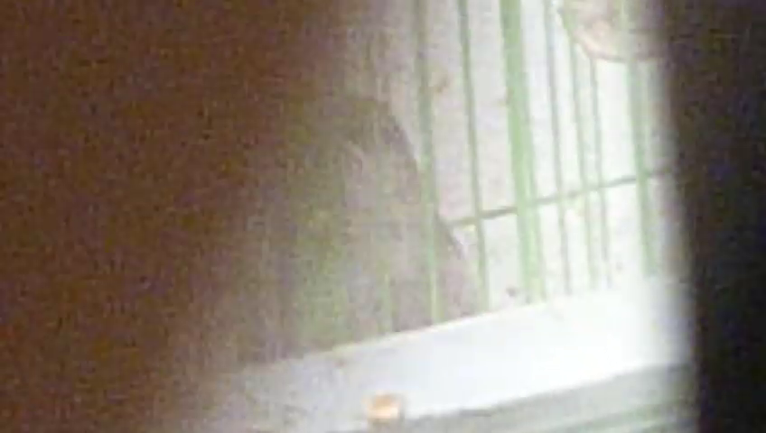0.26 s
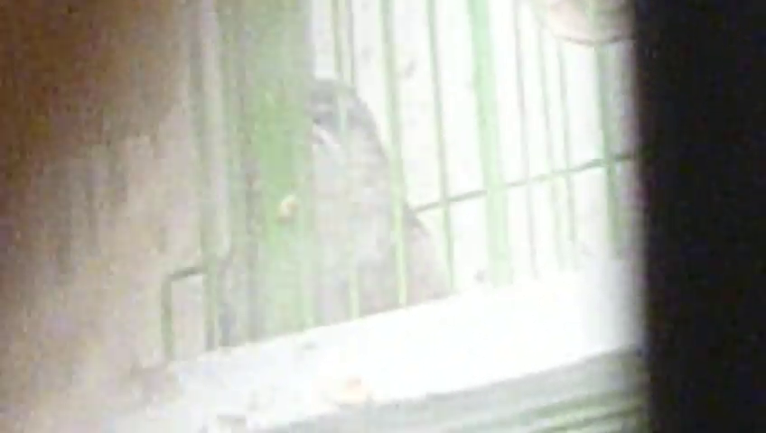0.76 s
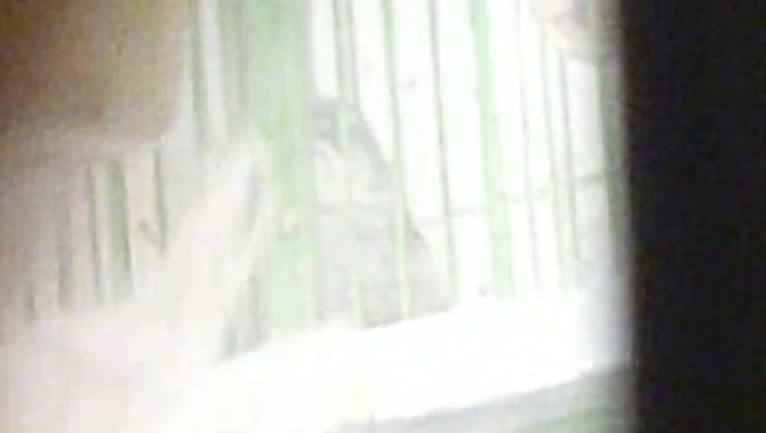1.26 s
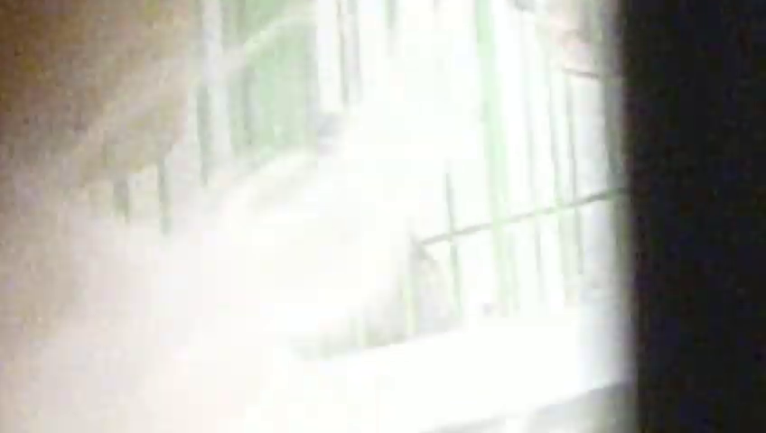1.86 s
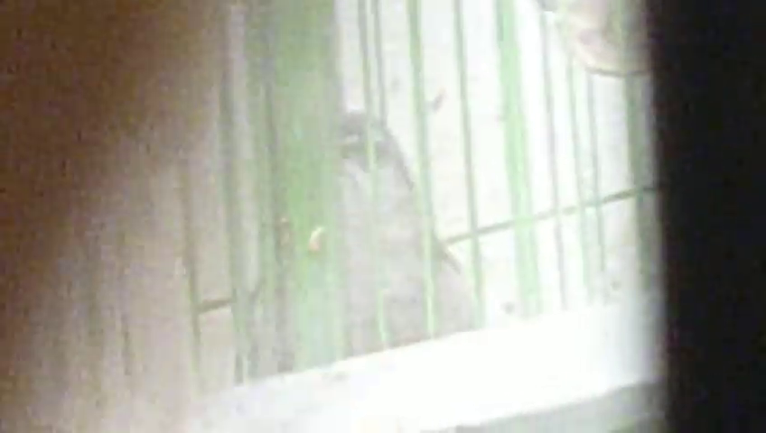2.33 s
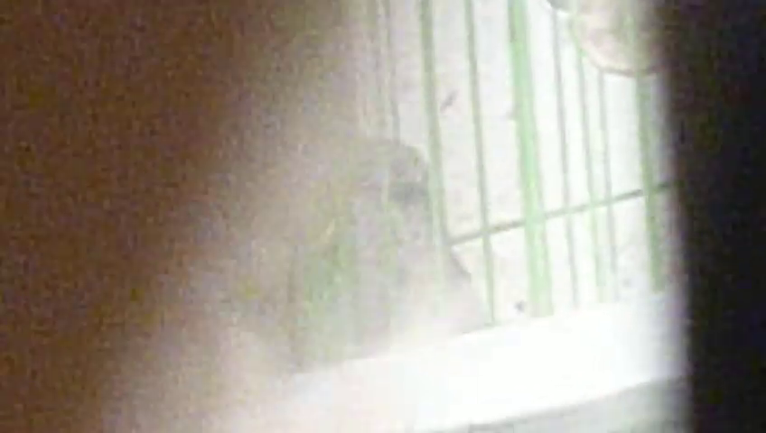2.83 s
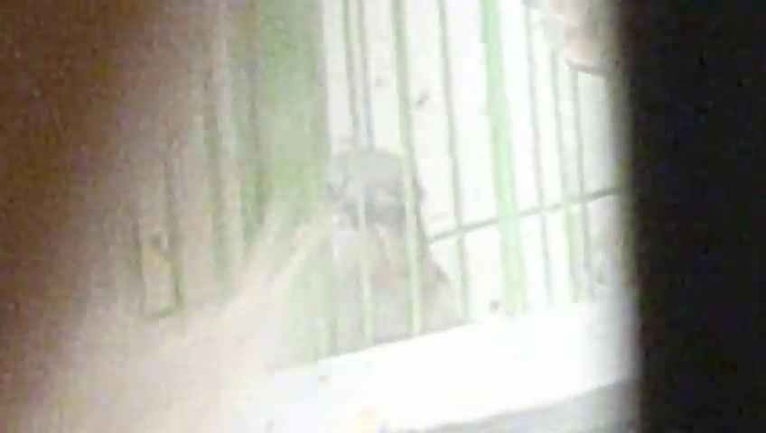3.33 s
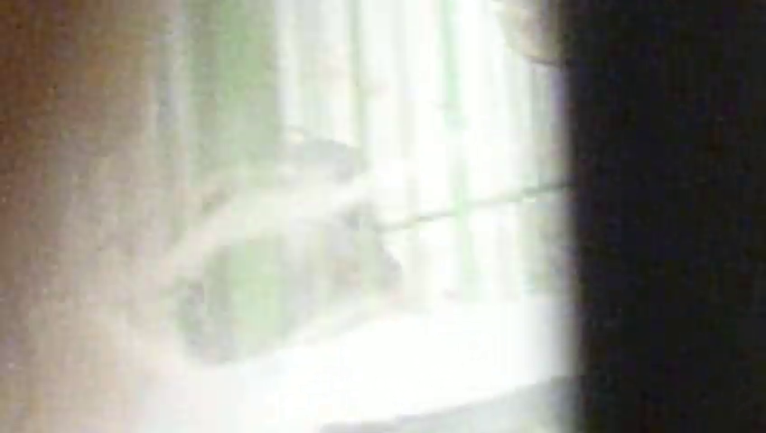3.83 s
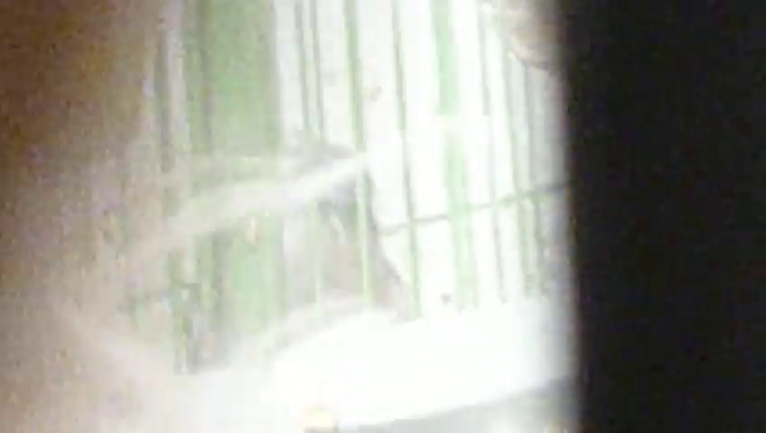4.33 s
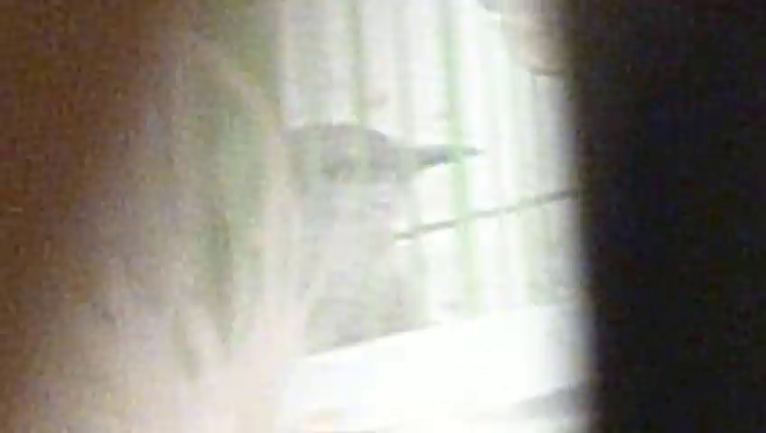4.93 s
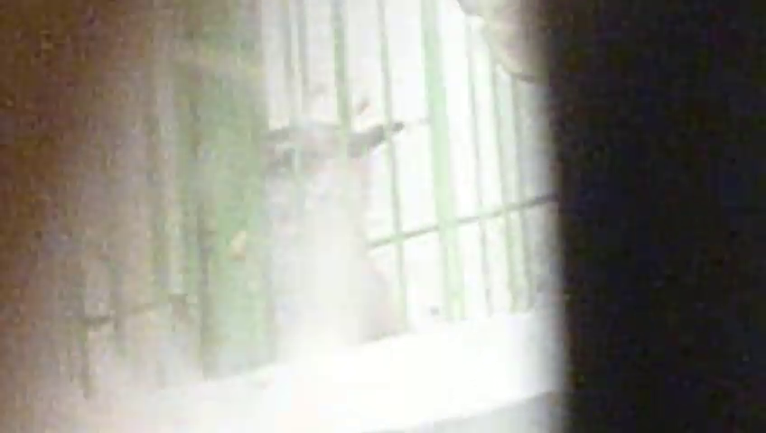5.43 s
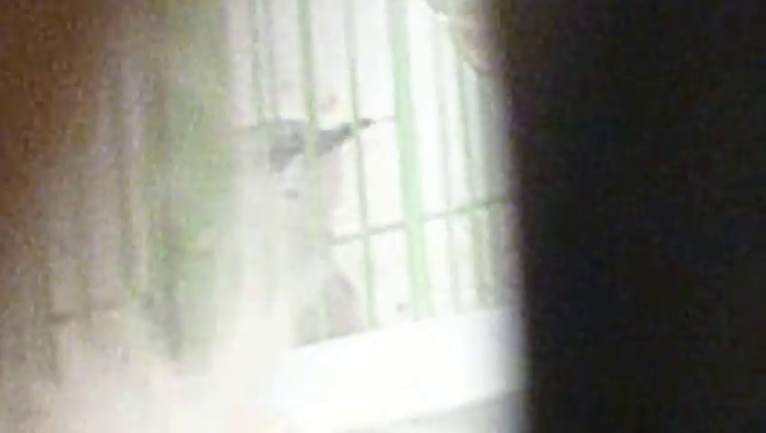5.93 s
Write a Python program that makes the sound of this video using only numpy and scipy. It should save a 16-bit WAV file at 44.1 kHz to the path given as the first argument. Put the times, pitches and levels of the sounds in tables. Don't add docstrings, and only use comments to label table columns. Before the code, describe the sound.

A caged songbird sings some way from a cheap camera in a hard-walled porch; every note is smeared by a short, dense reverberation. From 0 to 1.5 s come loose, very brief chirps, mostly falling glides and steep drops, with gaps around 0.5 s and a busier cluster from 1.2 s. Four arching whistles, climbing then falling, peak near 1.8, 2.1, 2.3 and 2.6 s, some richer in tone. From about 2.75 to 4.2 s it runs into quick slurred warbling around a middle-high pitch. Four louder, hoarse falling chirps with upward hooks follow near 4.3, 4.5, 4.8 and 5.0 s. Four pairs, a low scoop then a short upward flick, end the stretch at 5.25, 5.5, 5.7 and 6.0 s. Fainter, higher whistles from other birds appear occasionally, mainly after 4.3 s. Steady low-weighted hiss, a faint thin whine and sparse electrical ticks continue throughout.

```python
import sys
import numpy as np
from scipy import signal
from scipy.fft import rfft, irfft, next_fast_len
from scipy.io import wavfile
from scipy.ndimage import uniform_filter1d, map_coordinates

SR = 44100
rng = np.random.default_rng(int(sys.argv[2]) if len(sys.argv) > 2 else 0)


def pcm_store(signal):
    levels = np.round(np.clip(np.atleast_2d(signal), -1, 1) * 32767)
    wavfile.write(sys.argv[1], SR, levels.astype(np.int16).T)


def amplitude_ratio(level_db):
    exponent = np.asarray(level_db, float) / 20
    return 10 ** exponent


N = 272749

# (frequency [Hz], density [dB per Hz])
HISS_SPECTRUM = [(20, -22.5), (60, -8.5), (90, -6.5), (150, -2.5), (300, -0.5), (450, -3.5), (700, -6.5),
                 (1200, -10.5), (2500, -14.5), (5000, -18.5), (6500, -19.5), (7600, -23), (8300, -32.5),
                 (9000, -46)]
# (time [s], level [dB])
HISS_LEVEL = [(0.0, -57), (1.03, -57), (1.86, -56.5), (2.48, -57), (2.94, -57), (3.61, -57), (4.78, -56.5),
              (4.96, -57), (6.18, -56.5)]
# (start [s], length [s], start pitch [Hz],
# end pitch [Hz], level [dB])
PURE_GLIDES = [ (.008, 0.015, 4660, 4300, -63), (.04, 0.015, 4830, 4350, -69),
               (.062, 0.078, 4290, 3790, -60), (.75, 0.027, 2600, 2500, -66),
               (.2, 0.034, 2050, 1495, -64), (.205, 0.032, 3010, 2380, -59),
               (.365, .03, 2750, 2330, -67), (.37, 0.049, 1800, 1830, -66.5),
               (.695, 0.0348, 4510, 3960, -59.5), (.83, 0.047, 3060, 2560, -62),
               (.82, .07, 1980, 1850, -68), (1.035, 0.024, 4300, 4880, -66),
               (1.075, 0.028, 5310, 4210, -64), (1.1, 0.053, 4240, 3710, -62),
               (1.23, 0.025, 3084, 3230, -57), (1.24, 0.037, 1960, 2570, -58.5),
               (1.25, 0.016, 2440, 2910, -54), (1.428, 0.056, 3252, 3334, -54),
               (1.482, 0.029, 2075, 2430, -63.5),
               (1.928, 0.11, 2930, 2900, -63.5), (2.412, .06, 3020, 2980, -67),
                (2.752, 0.032, 2980, 3030, -58.5), (2.801, 0.053, 3180, 2926, -58.5),
                (2.909, 0.055, 3080, 2610, -60.5), (3.078, 0.057, 3060, 2986, -58),
                (3.337, 0.058, 3011, 2997, -52.5), (3.378, 0.043, 2140, 1760, -64),
                (3.826, 0.032, 3870, 3320, -68), (3.703, 0.066, 2954, 2926, -68.5),
                (3.845, .04, 2570, 2480, -61), (4.048, .035, 1976, 1560, -64.5),
                (4.085, 0.018, 3370, 3130, -59.5), (4.146, 0.022, 3600, 3590, -59.5),
                (4.863, .04, 3140, 3100, -71), (5.118, 0.036, 3090, 3080, -71),
                (3.988, 0.034, 2746, 2410, -56), (4.017, 0.041, 2460, 2665, -53),
                (1.494, .09, 3300, 3290, -72), (3.618, .04, 3010, 2940, -65),
                (2.969, 0.044, 3030, 3040, -60), (3.397, 0.051, 3020, 3000, -62.5),]
# (frequency [Hz], reverberation time T60 [s])
PORCH_DECAY = [(1500, .22), (3500, 0.22), (7000, 0.49)]
# (frequency [Hz], gain [dB])
MICROPHONE = [(100, -0.5), (1000, 3), (6500, -1.5), (7800, -0.5), (8600, -19.5), (9200, -70)]
# (start [s], length [s], start pitch [Hz], end pitch [Hz], level [dB])
DROPS = [(.112, 0.021, 3900, 3100, -58), (0.726, 0.021, 4060, 2966, -56), (1.252, 0.017, 3215, 2310, -57.5),
         (1.268, 0.024, 2900, 1760, -62), (1.41, 0.017, 4580, 3420, -58), (1.463, 0.0198, 3575, 2520, -57),
         (1.478, .02, 2895, 1956, -56), (3.825, .022, 2730, 2020, -58), (0.371, 0.0299, 2794, 1805, -67),
         (4.745, 0.013, 2607, 1410, -55)]
# (time [s], peak level [dB])
TICKS = [(0.1728, -52), (0.6943, -62), (0.926, -51.5), (1.1865, -56), (1.2255, -51), (1.6213, -52),
         (1.748, -56), (1.8175, -52), (1.8777, -56), (2.0905, -59), (2.3035, -57), (2.6635, -58),
         (2.9183, -71), (3.4466, -60.5), (3.9229, -48.5), (4.037, -54), (4.0925, -53.5), (4.1612, -52.5),
         (4.2272, -49), (4.579, -61), (5.0814, -50), (6.159, -64)]
# (start [s], length [s], start pitch [Hz], end pitch [Hz], level [dB])
NEIGHBOUR_WHISTLES = [ (1.317, 0.049, 423, 416, -58.5), (1.701, 0.034, 5950, 5670, -66),
                      (2.193, 0.023, 4490, 4420, -66), (2.374, 0.045, 4410, 4210, -69),
                      (3.625, 0.036, 2153, 2147, -60.5), (4.346, 0.088, 4670, 4440, -65.5),
                      (4.435, 0.072, 4310, 4110, -63.5), (4.456, 0.067, 3580, 3430, -62),
                      (4.62, .05, 5860, 6590, -66.5), (4.844, 0.053, 6090, 6800, -64.5),
                      (5.098, 0.072, 6000, 6660, -68), (5.378, 0.025, 5480, 5100, -59.5),
                      (5.617, 0.036, 5320, 5650, -66.5), (5.635, 0.05, 3810, 3770, -63),
                      (5.846, 0.045, 5370, 5185, -60.5), (6.11, 0.032, 5200, 5500, -66.5),
                      (4.14, .04, 4520, 4480, -71.5), (4.748, 0.023, 630, 590, -61), ]
# (time [s], pitch [ratio], level [dB], climb's octave [share])
ARCH_SHAPE = [(-.095, .62, -9, 0.73), (-.062, .76, -9, 1), (-.038, .94, -6, 0.86),
              (-.022, 1.01, -7.5, 0.63), (0, .99, -2.5, .2), (.025, .86, 0.5, 0.25),
              (0.059, 0.66, -9.5, .1)]
# (brink [s], top pitch [Hz], level [dB], octave of the climb [dB])
ARCHES = [
    (1.81, 3440, -54, -28),
    (2.08, 3295, -54, 1),
    (2.338, 3330, -54.5, -13),
    (2.624, 3308, -53.5, 1),
]
# (start [s], length [s], start pitch [Hz], end pitch [Hz], level [dB])
WARBLE = [ (2.976, .045, 3106, 2605, -56.5), (3.052, 0.05, 3173, 2490, -60.5),
          (3.239, .05, 2747, 2624, -58), (3.3, 0.047, 3080, 3000, -61.5), (3.336, 0.034, 2780, 2460, -59.5),
          (3.39, 0.049, 3053, 2664, -53), (3.578, .055, 3134, 2596, -60), (3.66, 0.061, 3053, 2826, -56.5),
          (3.727, 0.052, 3300, 2625, -61), (3.796, .035, 3130, 2710, -56.5), (4.06, 0.051, 2994, 2600, -58),
          (4.132, 0.046, 3090, 2630, -56.5), ]
# (length [share], sweep [share], level [dB])
SLUR_SHAPE = [(0, 0, -3.5), (.3, .15, -1.5), (.7, .88, 0.5), (1, 0.99, -3)]
# (time [s], pitch [ratio], level [dB])
CHIRP_PARTS = [
    [(-.028, .8, -10), (-.004, .9, -3.5)],
    [(0, 1, 0.5), (.018, .88, -4.5), (.03, 0.59, -16)],
    [(.035, .6, -13.5), (.07, .58, -21)],
]
# (time [s], pitch [ratio], level [dB])
HOOK_PARTS = [
    [(.03, .86, -14), (.058, .94, -11)],
    [(.061, .99, 2.5), (.068, 1.03, 1.5), (.075, 1.13, -0.5), (.081, 1.26, -8)],
]
# (start [s], pitch [Hz], level [dB], hook pitch [Hz], hook level [dB])
HOOKED_CHIRPS = [
    (4.281, 2868, -49.5, 2946, -60),
    (4.524, 2896, -47.5, 3125, -55.5),
    (4.764, 2855, -51.5, 3105, -54),
    (5.03, 2760, -51.5, 3145, -56.5),
]
# (time [s], pitch [ratio], level [dB])
SCOOP_SHAPE = [(0, 0.76, -7), (.012, .97, 0.5), (.043, 1.01, -3), (.054, 0.7093, 0.5)]
# (time [s], pitch [ratio], level [dB])
FLICK_SHAPE = [(0, .99, 3), (.011, 1.01, -4), (.02, 1.27, -5)]
# (start [s], scoop pitch [Hz], level [dB], delay of flick [s], flick level [dB])
PAIRS = [
    (5.25, 2426, -55.5, 0.089, -55),
    (5.495, 2405, -54, 0.088, -52),
    (5.73, 2360, -55.5, .092, -52),
    (5.984, 2223, -56, 0.069, -53),
]

PURE_OCTAVE_DB, CHIRP_OCTAVE_DB = -32, -25.5


def unit(x):
    return x / np.sqrt(np.mean(x ** 2) + 1e-20)


def along(points, hz):
    f, v = np.transpose(points)
    return np.interp(np.log(hz + 1), np.log(f + 1), v)


def wobble(rate_hz):
    knots = rng.standard_normal(int(N * rate_hz / SR) + 4)
    return map_coordinates(knots, [np.arange(N) * rate_hz / SR])


def coloured(x, spectrum):
    m = next_fast_len(N + 8192)
    gain = amplitude_ratio(along(spectrum, np.fft.rfftfreq(m, 1 / SR)))
    return irfft(rfft(x, m) * gain, m)[:N]


def add_note(track, rows, flutter, fade):
    s, hz, db, octave_db = np.transpose(rows)
    i = np.arange(round(s[0] * SR), min(N, round(s[-1] * SR)))
    t = i / SR

    def smooth(values):
        return uniform_filter1d(np.interp(t, s, values), size=300, mode="nearest")

    phase = 2 * np.pi * np.cumsum(smooth(hz) * flutter[i]) / SR
    nearest_end = np.minimum(t - s[0], s[-1] - t)
    edge = np.sin(np.pi / 2 * np.clip(nearest_end / fade, 0, 1))
    tone = np.sin(phase) + amplitude_ratio(smooth(octave_db)) * np.sin(2 * phase)
    track[i] += np.sqrt(2) * edge * amplitude_ratio(smooth(db)) * tone


def placed(shape, start, hz, db, octave_db):
    return [(start + s, hz * ratio, db + level, octave_db) for s, ratio, level in shape]


def hiss():
    s, db = np.transpose(HISS_LEVEL)
    level = np.interp(np.arange(N) / SR, s, db) + 0.5 + 0.54 * wobble(3.63)
    return unit(coloured(rng.standard_normal(N), HISS_SPECTRUM)) * amplitude_ratio(level)


def whine():
    t = np.arange(N) / SR
    return amplitude_ratio(-78) * np.sin(2 * np.pi * 6667 * t + 0.23 * wobble(26))


def glide(start, length, hz0, hz1, db):
    share = np.array([0, 0.45, 1])
    sweep = np.array([0, 0.6, 1])
    hz = hz0 + (hz1 - hz0) * sweep
    level = db - np.array([1.5, 0, 4.5])
    return np.transpose([start + length * share, hz, level, np.full(3, PURE_OCTAVE_DB)])


def song_notes():
    smooth = [glide(*row) for row in PURE_GLIDES]
    smooth += [slur(*row) for row in WARBLE]
    hoarse = [drop(*row) for row in DROPS] + [arch(*row) for row in ARCHES]
    for row in HOOKED_CHIRPS:
        chirp, hook = hooked_chirp(*row)
        hoarse += chirp
        smooth += hook
    for row in PAIRS:
        hoarse += pair(*row)
    return smooth, hoarse


def songbird():
    smooth, hoarse = np.zeros((2, N))
    tremor = wobble(150)
    smooth_notes, hoarse_notes = song_notes()
    for rows in smooth_notes:
        add_note(smooth, rows, 1 + 0.006 * tremor, fade=0.00073)
    for rows in hoarse_notes:
        add_note(hoarse, rows, 1 + 0.016 * tremor, fade=0.00073)
    swell = amplitude_ratio(1.5 * wobble(90) + 2.5 * wobble(220))
    rasp = 1 + 0.3 * wobble(700)
    return swell * (smooth + hoarse * rasp)


def porch(x):
    slices = np.arange(N) * 12 / SR % 3
    out = np.zeros(N)
    for k in range(3):
        hz, t, z = signal.stft(rng.standard_normal(SR // 2), SR, nperseg=256)
        since = np.maximum(t - .018, 0)
        walls = amplitude_ratio(-60 * since / along(PORCH_DECAY, hz)[:, None])
        yard = amplitude_ratio(-11.0 - 60 * t / 1.1)
        tail = signal.istft(z * (walls + yard), SR, nperseg=256)[1]
        share = np.clip(1 - np.abs((slices - k + 3 / 2) % 3 - 3 / 2), 0, 1)
        delayed = np.pad(x * np.sqrt(share), (60, 0))
        out += signal.fftconvolve(delayed, tail / np.linalg.norm(tail))[:N]
    return out


def drop(start, length, hz0, hz1, db):
    return [(start, hz0, db, PURE_OCTAVE_DB), (start + length, hz1, db - 1.5, PURE_OCTAVE_DB)]


def ticks():
    spikes = (rng.random(N) < 25 / SR) * amplitude_ratio(-50) * rng.standard_normal(N)
    for s, db in TICKS:
        spikes[round((s + .0012) * SR)] = amplitude_ratio(db + 20.5)
    return coloured(spikes, MICROPHONE)


def neighbours():
    track = np.zeros(N)
    flutter = 1 + 0.0032 * wobble(100)
    for start, length, hz0, hz1, db in NEIGHBOUR_WHISTLES:
        rows = [(start, hz0, db, -30), (start + length, hz1, db, -30)]
        add_note(track, rows, flutter, fade=.006)
    return track * amplitude_ratio(0.82 * wobble(65))


def arch(brink, hz, db, climb_db):
    octave_range = climb_db - PURE_OCTAVE_DB
    return [(brink + s, hz * ratio, db + level, PURE_OCTAVE_DB + share * octave_range)
            for s, ratio, level, share in ARCH_SHAPE]


def slur(start, length, hz0, hz1, db):
    share, sweep, level = np.transpose(SLUR_SHAPE)
    hz = hz0 + (hz1 - hz0) * sweep
    return np.transpose([start + length * share, hz, db + level, np.full(len(share), -3)])


def hooked_chirp(start, hz, db, hook_hz, hook_db):
    chirp = [placed(part, start, hz, db, CHIRP_OCTAVE_DB) for part in CHIRP_PARTS]
    hook = [placed(part, start, hook_hz, hook_db, CHIRP_OCTAVE_DB) for part in HOOK_PARTS]
    return chirp, hook


def pair(start, hz, db, after, flick_db):
    scoop = placed(SCOOP_SHAPE, start, hz, db, CHIRP_OCTAVE_DB)
    flick = placed(FLICK_SHAPE, start + after, 2824, flick_db, -18)
    return [scoop, flick]


def scene():
    birds = songbird() + neighbours()
    song = amplitude_ratio(-5) * birds + porch(birds)
    return (coloured(song, MICROPHONE) + hiss() + whine() + ticks())[None]


def low_pass(x):
    return signal.sosfilt(signal.butter(12, 8580, fs=SR, output="sos"), x)


def record(dry):
    mix = dry - .0538
    return low_pass(mix)


dry = scene()
out = record(dry)
pcm_store(out)
```